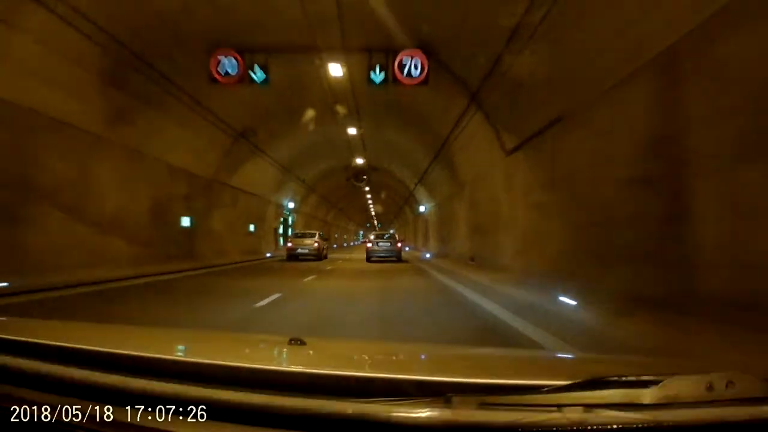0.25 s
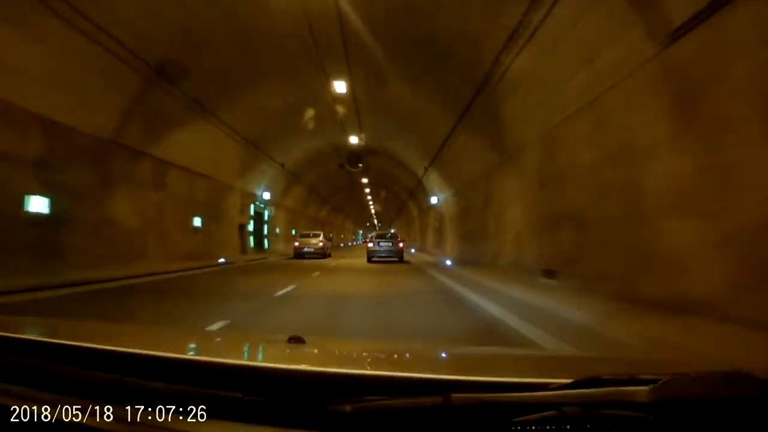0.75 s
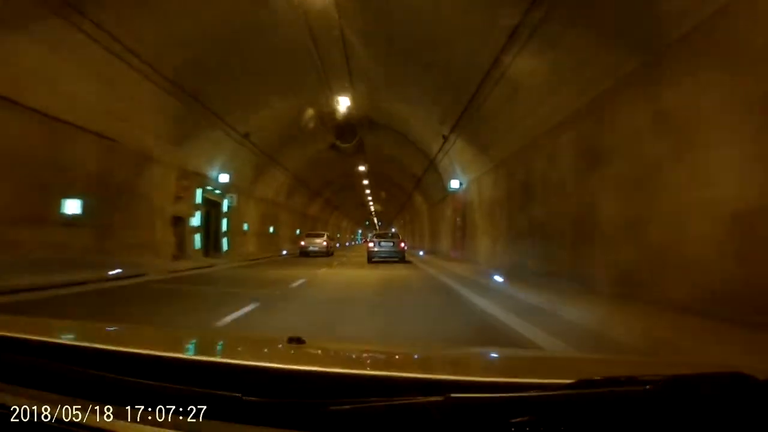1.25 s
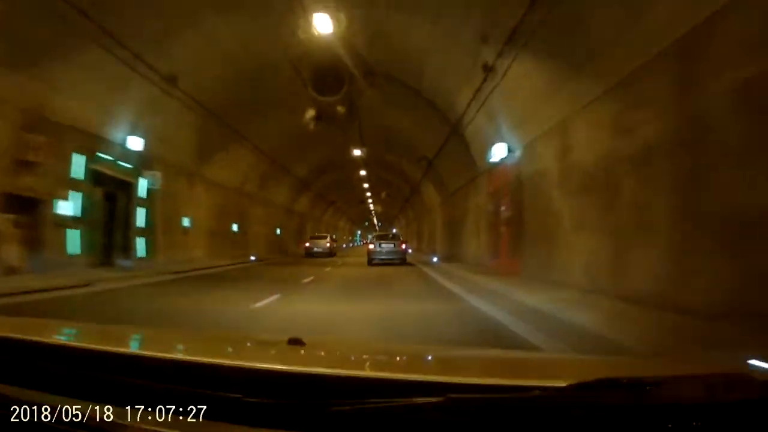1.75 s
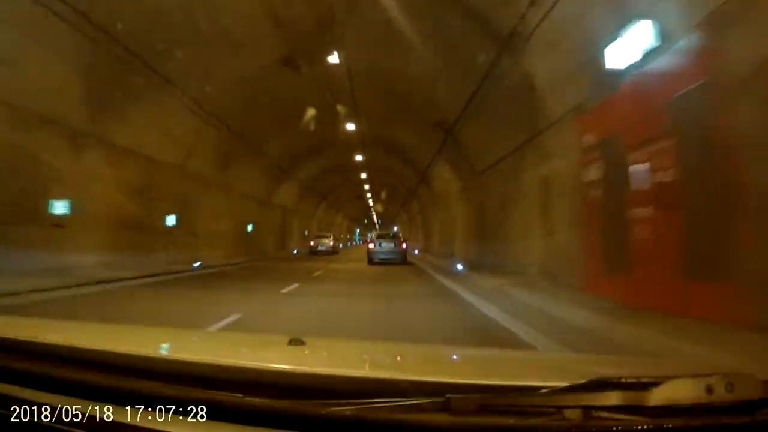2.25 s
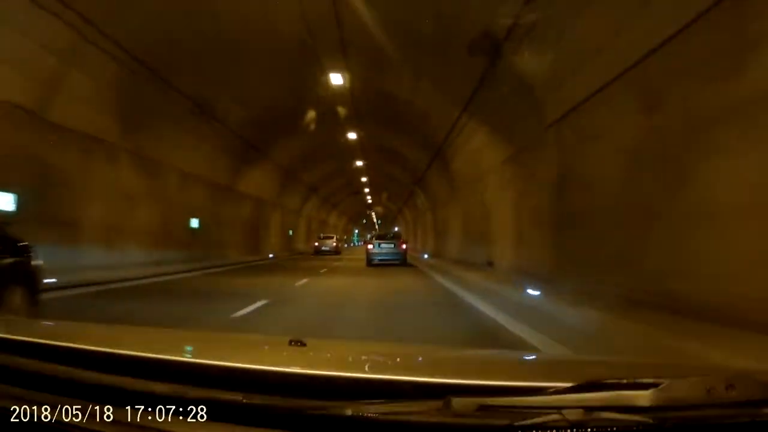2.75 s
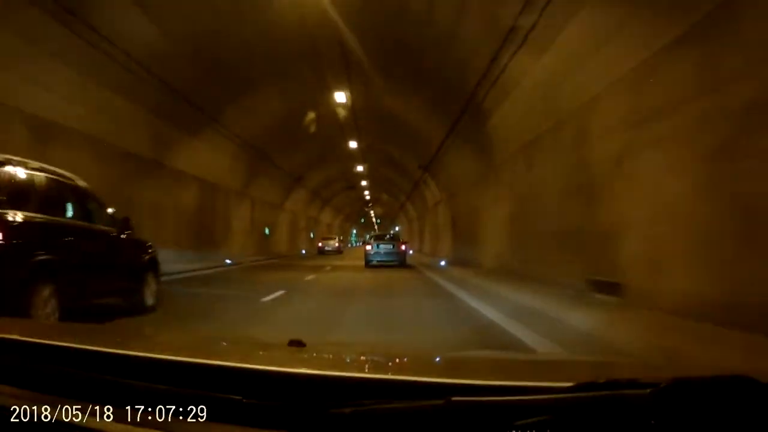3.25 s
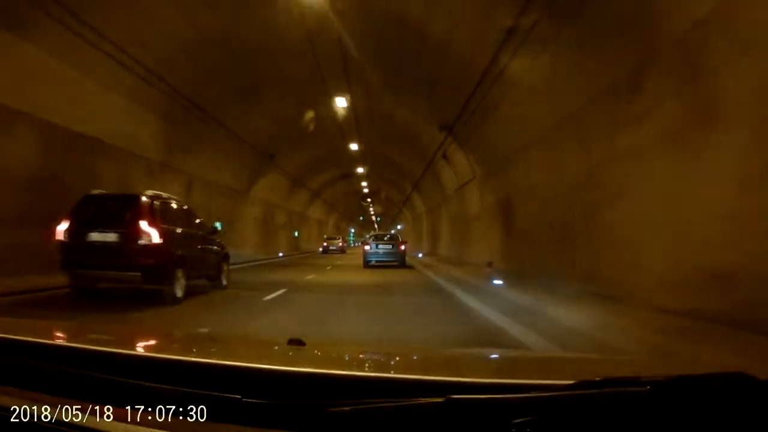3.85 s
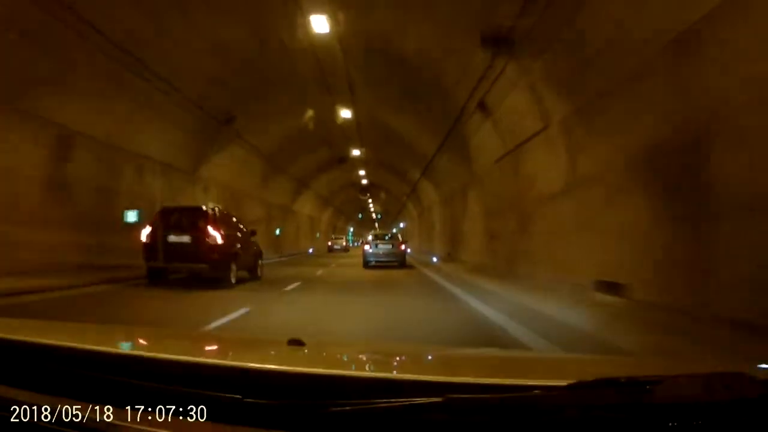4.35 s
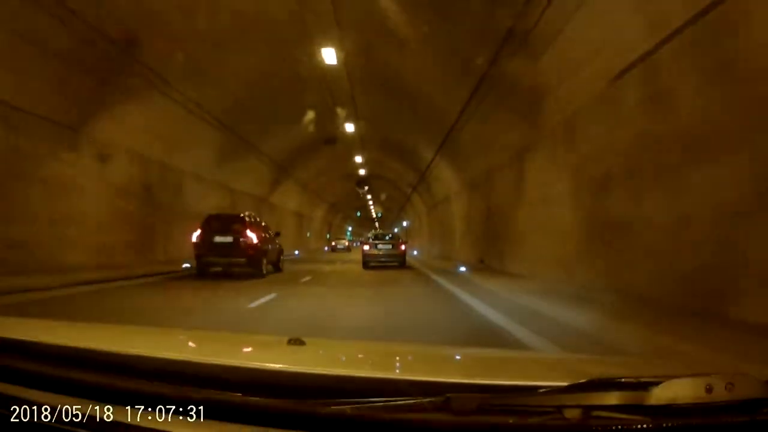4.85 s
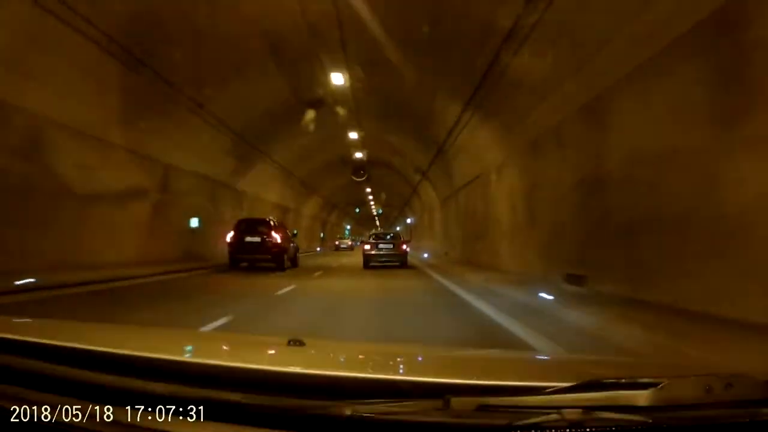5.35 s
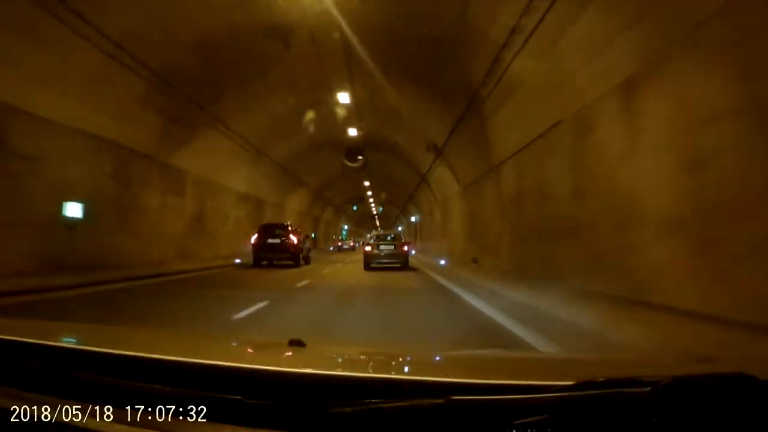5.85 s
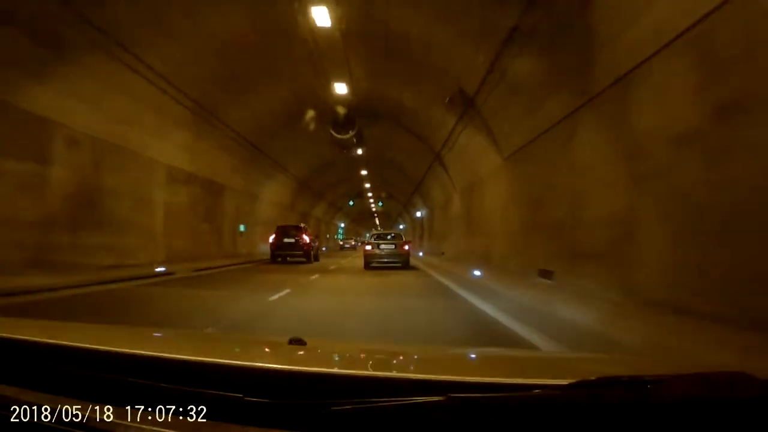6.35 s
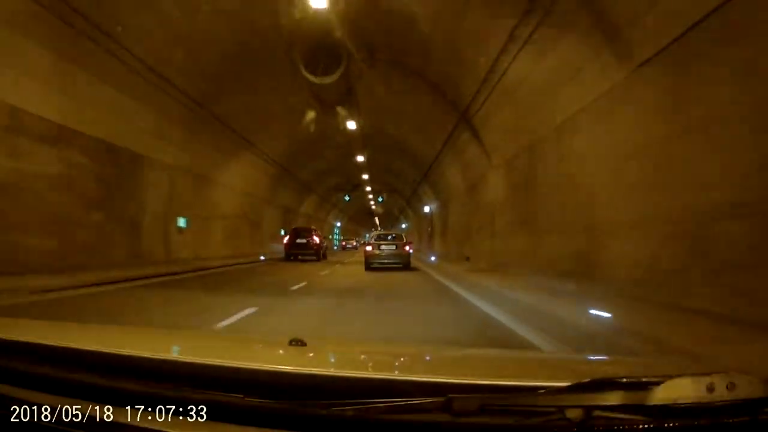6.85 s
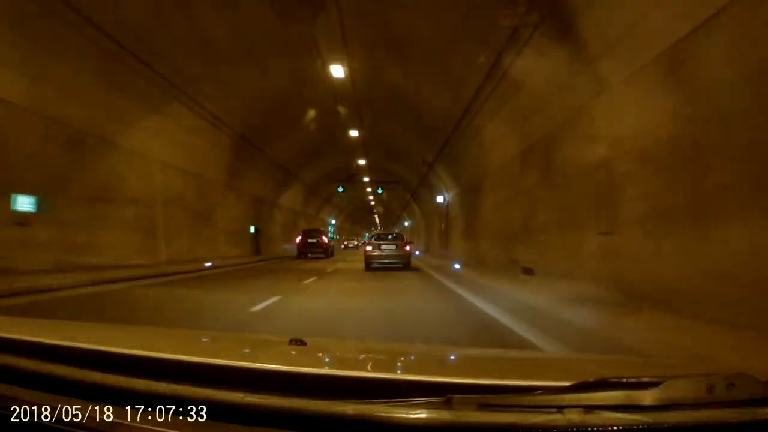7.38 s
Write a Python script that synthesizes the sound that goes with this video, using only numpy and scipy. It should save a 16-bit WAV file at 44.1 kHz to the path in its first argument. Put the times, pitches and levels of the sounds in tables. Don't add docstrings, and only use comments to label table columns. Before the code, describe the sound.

Inside a car easing down through a tunnel, a low engine hum and bassy tyre rumble run steadily, with soft thumps from rough asphalt.

```python
import sys
import numpy as np
from scipy import signal
from scipy.fft import rfft, irfft, next_fast_len
from scipy.io import wavfile
from scipy.ndimage import uniform_filter1d, map_coordinates

SR = 44100
rng = np.random.default_rng(int(sys.argv[2]) if len(sys.argv) > 2 else 0)


def invert_db(level):
    return 10 ** (np.asarray(level, dtype=float) / 20)


def generate_wav(sig):
    pcm = np.round(np.clip(np.atleast_2d(sig).T, -1, 1) * 32767).astype(np.int16)
    wavfile.write(sys.argv[1], SR, pcm)


N = 336042


def unit(x):
    return x / np.sqrt(np.mean(x ** 2) + 1e-20)


def wobble(rate):
    knots = rng.standard_normal(int(N * rate / SR) + 4)
    return map_coordinates(knots, [np.arange(N) * rate / SR])


def swells(at_s, half_s, top_db):
    t = np.arange(N) / SR
    return sum(db * np.exp(-((t - s) / half) ** 2) for s, half, db in np.broadcast(at_s, half_s, top_db))


def rush(spectrum, lumpy_db, rate):
    m = next_fast_len(N + 8192)
    hz, db = np.transpose(spectrum)
    log_hz = np.log(np.fft.rfftfreq(m, 1 / SR) + 1)
    gain = invert_db(np.interp(log_hz, np.log(hz + 1), db, left=-120, right=-120))
    noise = irfft(rfft(rng.standard_normal(m)) * gain, m)[:N]
    return unit(noise * invert_db(lumpy_db * wobble(rate)))


def steadied(x, span_s):
    power = np.abs(uniform_filter1d(x ** 2, round(span_s * SR)))
    return unit(x / np.sqrt(power + 1e-3))


# (time [s], firing rate [Hz])
FIRING_RATE = [
    (0.0, 71.61),
    (0.69, 71.25),
    (2.08, 69.72),
    (2.77, 69.29),
    (4.16, 68.54),
    (4.85, 68.06),
    (7.62, 66.6),
]


def firing_hz():
    s, hz = np.transpose(FIRING_RATE)
    return np.interp(np.arange(N) / SR, s, hz)


def crank_hz():
    return firing_hz() / 2


# (frequency [Hz], width [Hz], lift [dB])
RESONANCES = [
    (166.9, 3.5, 5),
    (218.4, 3.6, 9),
    (390, 20, 9),
    (1110, 32, 10),
]


def shaft(speed_hz, orders, levels_db, sway_db, rate):
    angle = 2 * np.pi * np.cumsum(speed_hz) / SR
    out = np.zeros(N)
    for order, db in zip(orders, levels_db):
        lift_db = sum(top / (1 + ((order * speed_hz - hz) / width) ** 2) for hz, width, top in RESONANCES)
        gain = unit(invert_db(lift_db + sway_db * wobble(rate)))
        tone = np.sin(order * angle + rng.uniform(0, 2 * np.pi))
        out += invert_db(db) * np.sqrt(2) * gain * tone
    return out


# (multiple of crank speed, level [dB rms])
ENGINE_TONES = [(0.5, -45.0), (2.0, -31.0), (2.5, -43.0), (4.0, -36.0), (4.5, -48.0), (5.0, -45.0),
                (6.0, -38.0), (6.5, -42.0), (7.0, -47.0), (7.5, -40.0), (8.5, -46.0), (10.5, -45.0),
                (12.0, -48.0), (13.0, -56.0), (14.0, -55.0), (15.0, -59.0), (16.0, -55.0), (16.5, -53.0),
                (17.0, -51.0), (17.5, -53.0), (19.0, -51.0), (24.0, -58.0), (24.5, -59.0), (25.5, -59.0),
                (30.0, -59.0), (32.0, -56.0), (33.5, -58.0), (34.0, -57.0), (34.5, -61.0), (36.0, -55.0)]


def engine():
    orders, levels_db = np.transpose(ENGINE_TONES)
    return invert_db(0.2) * shaft(crank_hz(), orders, levels_db, sway_db=0.14, rate=3.6)


def valve_train():
    orders = np.arange(37.5, 57, .5)
    levels_db = -68 - 0.56 * (orders - 38) + rng.normal(0, 0.89, len(orders))
    return shaft(crank_hz(), orders, levels_db, sway_db=5.5, rate=1.1)


PUMP_LEVELS = [-43, -34, -43, -45, -42, -50, -58]


def pump():
    turns_per_crank_turn = 1.6185
    orders = [2, 3, 4, 5, 6, 8, 9]
    return invert_db(0.2) * shaft(turns_per_crank_turn * crank_hz(), orders, PUMP_LEVELS, sway_db=3.0, rate=2.5)


# (time [s], half length [s], jolt [dB])
ROUGH_PATCHES = [(0.126, 0.21, 7), (0.644, .07, 8), (0.948, .1, 8.5), (1.35, 0.15, 3), (1.85, .2, 6),
                 (2.3, 0.24, 10), (2.82, 0.11, 5.5), (3.25, .15, 5.5), (3.8, .12, 0.5), (4.1, .1, 4),
                 (4.55, .18, 9), (5.28, 0.076, 11), (5.948, 0.11, 7), (6.196, 0.063, 7), (6.85, .12, 5.5),
                 (7.15, .1, 3), (7.45, .14, 10.5)]


def jolts_db():
    return swells(*np.transpose(ROUGH_PATCHES))


WHEEL_LEVELS = [-35, -43, -37, -43]


def wheels():
    turns_per_crank_turn = .2815
    bumps = unit(invert_db(.65 * jolts_db()))
    orders = [2, 3, 4, 9]
    return bumps * shaft(turns_per_crank_turn * crank_hz(), orders, WHEEL_LEVELS, sway_db=-0.2, rate=2.9)


def faster_hz():
    return firing_hz() - np.mean(firing_hz())


# (time [s], level [dB])
RIBBED_STRETCHES = [
    (.3, 3),
    (1.0, 1.5),
    (1.6, 3),
    (2.4, 1.5),
    (3.8, 0.5),
    (4.3, 3),
    (4.9, 2),
    (5.3, 0.5),
    (7.1, 3),
]


def drumming_db():
    at_s, level_db = np.transpose(RIBBED_STRETCHES)
    return swells(at_s, 0.074, level_db)


# (frequency [Hz], level [dB per Hz])
SHAKE_COLOUR = [(5, -34.5), (9, -26), (15, -16), (19, -11.5), (30, -6.5), (39, 0), (46, -8), (56, -1),
                (66, -7), (76, -15), (100, -65.5)]


def body_shake():
    return invert_db(-37 + jolts_db()) * steadied(rush(SHAKE_COLOUR, lumpy_db=2.0, rate=9), span_s=.15)


# (frequency [Hz], level [dB per Hz])
RUMBLE_COLOUR = [(45, -49.5), (68, -2), (90, 1.5), (118, -2.5), (148, -6), (166, -1), (190, -5.5),
                 (212, -2.5), (226, -8), (250, -3.5), (288, -3), (312, -11.5), (340, -10.5), (420, -64)]


def floor_rumble():
    level_db = -28 + 0.18 * jolts_db() + 0.11 * faster_hz()
    return invert_db(level_db) * steadied(rush(RUMBLE_COLOUR, lumpy_db=-0.6, rate=11), span_s=.2)


# (frequency [Hz], level [dB per Hz])
BOOM_COLOUR = [(270, -57.5), (315, -9), (338, -2), (355, 1), (372, -3.5), (382, -1.5), (395, -10),
               (407, -7.5), (432, -11.5), (450, -11), (480, -10.5), (520, -20.5), (600, -50.5)]


def cabin_boom():
    level_db = -32 + drumming_db() + 0.51 * faster_hz()
    return invert_db(level_db) * steadied(rush(BOOM_COLOUR, lumpy_db=-1.3, rate=8.3), span_s=0.24)


# (frequency [Hz], level [dB per Hz])
TYRE_COLOUR = [(420, -57), (510, -6), (590, -1), (700, -3), (850, -2.5), (1180, -8), (1300, -13),
               (1550, -13), (2000, -20), (2300, -23), (2930, -24), (3020, -29.5), (3200, -37.5),
               (3700, -71.5)]


def tyre_roar():
    road_db = 0.041 * jolts_db() + .15 * drumming_db()
    passing_car_db = swells(3.4, 0.77, 0.5)
    level_db = -34.5 + road_db + 0.15 * faster_hz() + passing_car_db
    return invert_db(level_db) * rush(TYRE_COLOUR, lumpy_db=0.28, rate=12)


# (frequency [Hz], level [dB per Hz])
WIND_COLOUR = [(2600, -42.5), (3200, -0.5), (3650, 0), (4200, -2), (4330, -5.5), (4380, 1.5), (4450, -4),
               (4650, -5.5), (4720, -0.5), (4820, -6.5), (5300, -10), (6000, -16.5), (7000, -37.5)]


def wind():
    return invert_db(-62.5) * rush(WIND_COLOUR, lumpy_db=0.0, rate=5)


# (frequency [Hz], level [dB per Hz])
HISS_COLOUR = [(4500, -25.5), (5700, -3), (6500, -0.5), (8500, -2.5), (10200, -2), (10400, -1.5),
               (10700, -2.5), (13000, -4), (14800, -4.5), (15430, -8), (15480, -9.5), (15800, -10)]


def microphone_hiss():
    return invert_db(-70.5) * rush(HISS_COLOUR, lumpy_db=.1, rate=7.9)


def treble_gaps(x):
    gap_share, gap_from_hz = .026, 6500
    edge_hz, edge_open_share = 15500, .11
    hz, _, z = signal.stft(x, SR, nperseg=1024)
    mood = unit(uniform_filter1d(rng.standard_normal(z.shape[1]), 4))
    patches = np.kron(rng.standard_normal(np.add(z.shape, 4) // [3, 2]), np.ones((3, 2)))
    patches = patches[:len(hz), :len(mood)]
    field = unit(uniform_filter1d(patches, 5, 1)) - .4 * mood - hz[:, None] / 12000
    treble = (hz > gap_from_hz) & (hz < edge_hz)
    gaps = (field < np.quantile(field[treble], gap_share)) & treble[:, None]
    widened = uniform_filter1d(gaps * 1., 3, 1) > .1
    shut = (mood > np.quantile(mood, edge_open_share)) & (hz > edge_hz)[:, None]
    return signal.istft(z * ~widened * ~shut, SR, nperseg=1024)[1][..., :N]


def scene():
    drivetrain = engine() + valve_train() + pump() + wheels()
    road = body_shake() + floor_rumble() + cabin_boom() + tyre_roar()
    return (drivetrain + road + wind())[None]


def low_pass(x):
    return signal.sosfilt(signal.butter(12, 15720, fs=SR, output="sos"), x)


def record(dry):
    lopsided = 0.064 * (dry[0] ** 2 - np.mean(dry ** 2))
    heard = treble_gaps(dry[0] + lopsided + microphone_hiss())
    opens_at, click_s = -.05, .003
    start_click = (opens_at - heard[0]) * np.exp(-np.arange(N) / (click_s * SR))
    fade = np.clip(np.arange(N)[::-1] / (.004 * SR), .1, 1)
    return low_pass(((heard + start_click) * fade)[None])


dry = scene()
out = record(dry)
generate_wav(out)
```